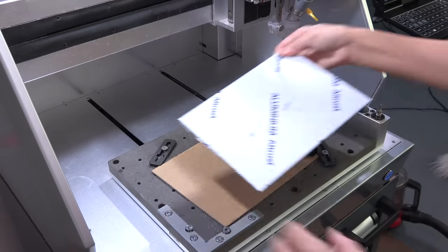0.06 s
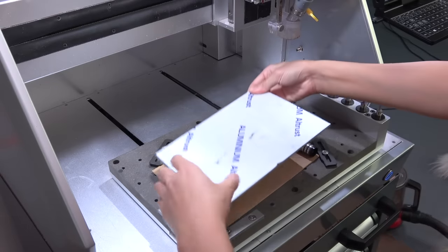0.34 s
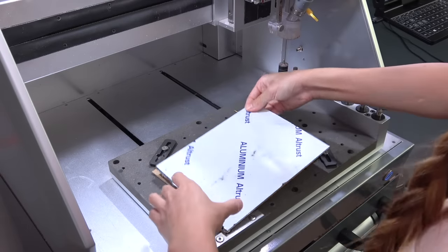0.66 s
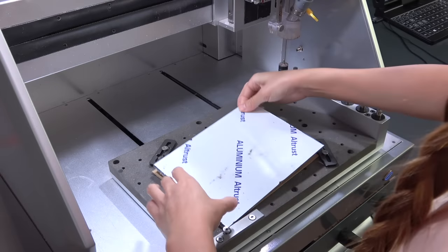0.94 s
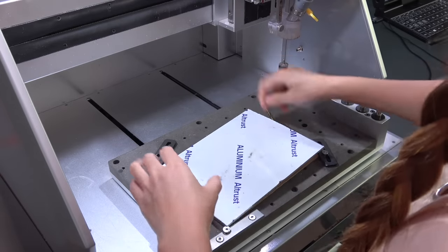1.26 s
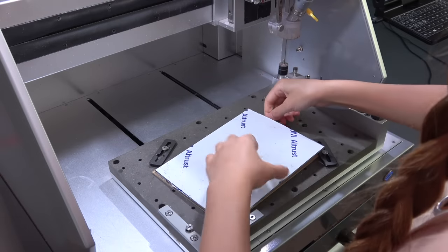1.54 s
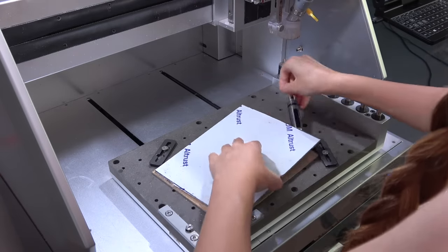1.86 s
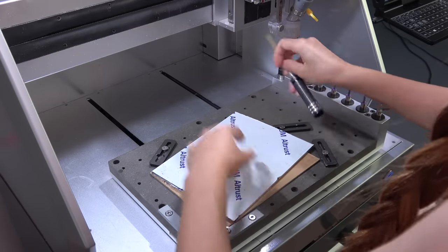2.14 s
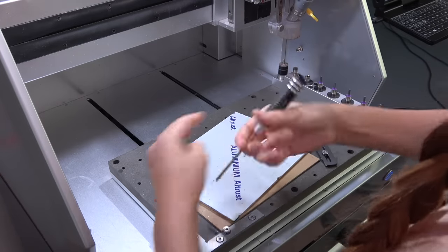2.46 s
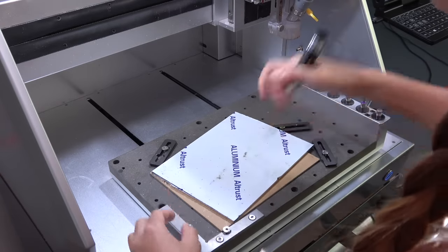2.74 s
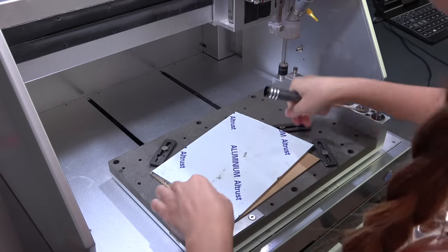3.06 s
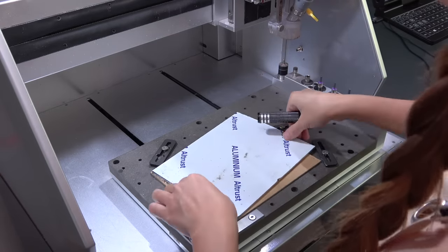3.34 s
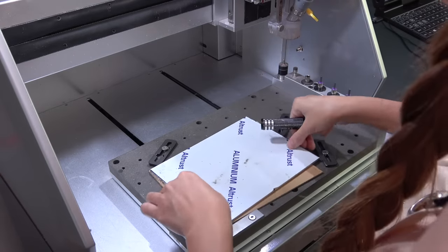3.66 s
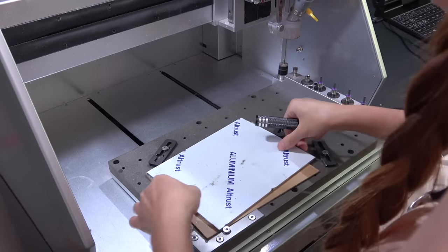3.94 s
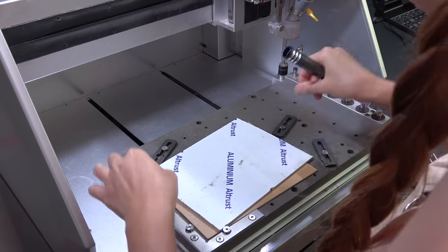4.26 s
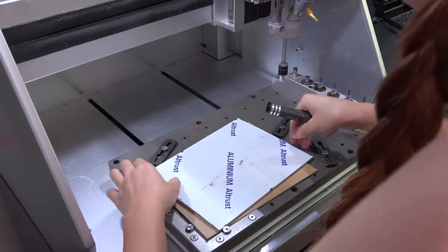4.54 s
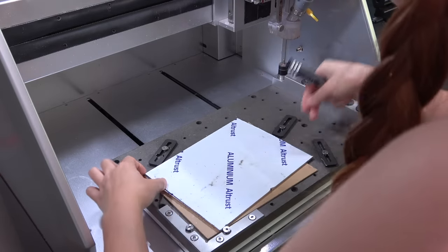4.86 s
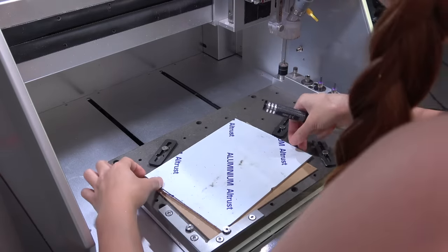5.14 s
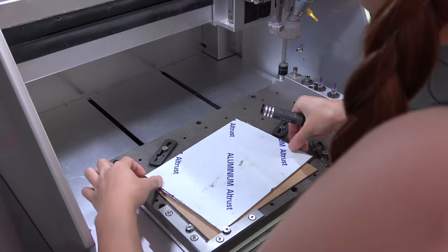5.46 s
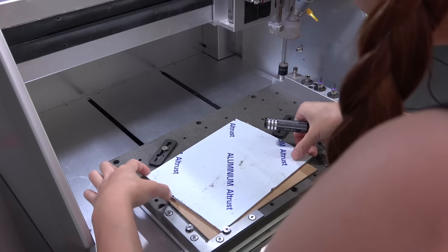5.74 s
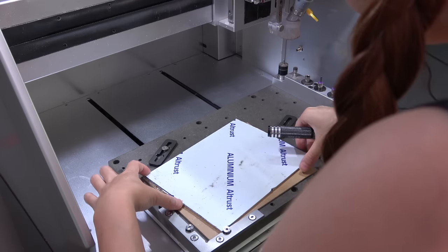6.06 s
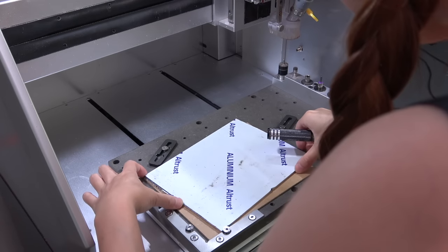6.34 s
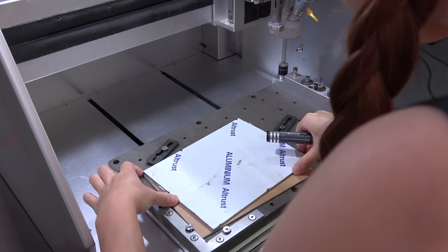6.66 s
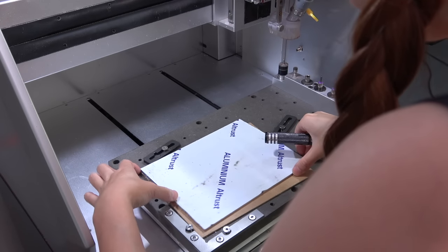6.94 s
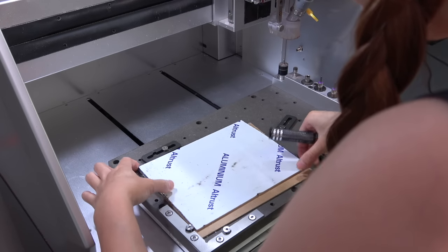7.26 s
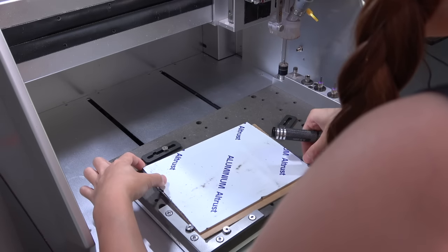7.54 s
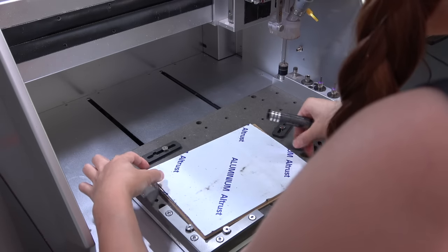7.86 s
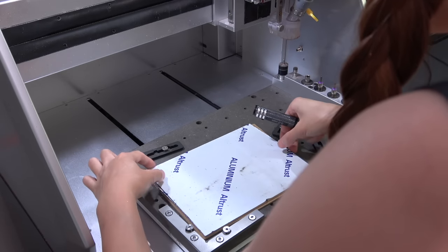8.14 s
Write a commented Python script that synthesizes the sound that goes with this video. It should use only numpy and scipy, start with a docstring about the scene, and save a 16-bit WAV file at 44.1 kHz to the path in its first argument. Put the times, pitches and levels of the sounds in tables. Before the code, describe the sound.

A faint fan hums while a thin metal sheet clatters and thumps down onto cardboard. More clacks and a short scrape lead into the loud bang of a steel tool on a metal bed, which rings as the machine cabinet booms. The rest is softer: hands rubbing and nudging the sheet, small high clinks, occasional dull knocks. It is heard from nearby in a small, slightly echoing workshop.

```python
"""Over a humming fan come a low bump and a soft rub, then the clacks, scrapes and thuds of an aluminium sheet
being laid on a cardboard pad on the bed of a small milling machine. A steel clamp slams onto the bed, which
rings while the cabinet booms. Hands slide, press and tap the sheet; two loose steel clamps clink. Blows are
decaying modes, scrapes are stick-slip pulses driving those modes, rubs are fine friction noise, and the fan is
air noise with housing resonances. Blows and scrapes echo in a small workshop."""
import sys
import numpy as np
from scipy import signal
from scipy.fft import rfft, irfft
from scipy.io import wavfile
from scipy.ndimage import uniform_filter1d

SR = 44100
rng = np.random.default_rng(int(sys.argv[2]) if len(sys.argv) > 2 else 0)


def waveform_to_disk(signal):
    """Save audio, clipped to [-1, 1], as 16-bit WAV at the path in sys.argv[1]."""
    frames = np.transpose(np.atleast_2d(signal))
    scaled = np.clip(frames, -1, 1) * 32767
    samples = np.round(scaled).astype(np.int16)
    wavfile.write(sys.argv[1], SR, samples)


N = 370440
TIME = np.arange(N) / SR
AGE = np.arange(SR) / SR  # seconds since a blow
SHORT = SR // 5  # samples in a damped blow
SOFT_CONTACT_HZ = 1220

# Modes of sheet, machine cabinet and frame. Each row: frequency in Hz, level in dB, base t60 in seconds.
SHEET_MODES = [(745, -15, .12), (921, -9.5, 0.17), (1111.5, -10.5, .12), (1470, -7.5, .13), (1844, 0, .12),
               (1882, -4, .08), (2085, -5.5, 0.1), (2245, -3.5, 0.1), (2396, -6.5, 0.14), (2700, -7, 0.065),
               (3370, -8, .11), (3460, -8, .11), (3684, -8.5, .09), (4490, -16, 0.1), (4740, -19.5, 0.21),
               (5210, -22.5, 0.11), (6055, -15.5, .12), (6700, -26, 0.089), (8100, -27, .1),
               (9200, -25.5, .08), (10600, -30.5, .08)]
CABINET_MODES = [(128, -9.5, 0.41), (140.4, -2.5, .5), (150.7, -0.5, 0.34), (166, -8, .3), (242, -11.5, .3),
                 (333, -7, 0.23)]
FRAME_MODES = [(67, 0.5, 1.8), (93, 0.5, 1.2)]
# Dense modes of sheet, pad and bare contact. Each row: frequency in Hz, density in dB, base t60 in seconds.
SHEET_BANDS = [(300, -12, .1), (900, -1.5, .1), (2000, -1, 0.11), (3600, -3.5, 0.14), (5000, -14, .08),
               (9500, -20, .07), (15000, -26, .06)]
PAD_BANDS = [(120, -11.5, .25), (300, -5, 0.19), (597, -0.5, .12), (1100, -1, .07), (1598, -11, 0.062),
             (4000, -19.5, 0.068)]
TICK_BANDS = [(1000, -9, .02), (3010, -2.5, 0.023), (6060, -3.5, 0.017), (8800, 1, 0.044),
              (11400, -8.5, 0.021), (15000, -7.5, 0.023)]


def amp(db):
    """Decibels to gain."""
    return np.exp(np.asarray(db) * (np.log(10) / 20))


def unit(x):
    """Scale to rms 1."""
    return x / np.sqrt(np.mean(x ** 2))


def unit_hit(x):
    """Scale a blow's loudest 256 samples to rms 1."""
    return x / np.sqrt(uniform_filter1d(x ** 2, 256).max())


def add(track, start_s, x):
    """Mix x into the track."""
    start = int(start_s * SR)
    track[start:start + len(x)] += x[:N - start]


def over_hz(points_hz, values, size):
    """Interpolate onto FFT bins in log frequency."""
    return np.interp(np.log(np.arange(size // 2 + 1) * SR / size + 1), np.log(points_hz), values)


def colour(x, spectrum):
    """Filter by a spectrum, to rms 1."""
    hz, db = np.transpose(spectrum)
    return unit(irfft(rfft(x) * amp(over_hz(hz, db, len(x))), len(x)))


def soften(x, hz):
    """Low-pass: a softer contact lasts longer and loses treble."""
    return signal.sosfilt(signal.butter(2, min(hz, .45 * SR), fs=SR, output="sos"), x)


def resonate(x, hz, width_hz):
    """One resonance, gain 1 at its centre."""
    return signal.lfilter(*signal.iirpeak(min(hz, .45 * SR), hz / width_hz, fs=SR), x)


def drift(rate_hz):
    """Slow random curve, rms 1."""
    count = int(N / SR * rate_hz) + 2
    return unit(np.interp(TIME, np.linspace(0, N / SR, count), rng.standard_normal(count)))


def envelope(hz, t60_s, build_cycles, size):
    """Rise and decay of a ring; low bending waves spread slowly and build late."""
    age = AGE[:size]
    return (1 - np.exp(-age * hz / build_cycles)) * np.exp(-np.log(1000) * age / t60_s)


def ring(modes, t60_scale=1, build_cycles=1, scatter_db=1.5, detune=.004, size=SHORT):
    """Decaying modes; level, tuning and phase vary per blow."""
    out = np.zeros(size)
    for hz, db, t60_s in modes:
        loud, sharp, phase = rng.standard_normal(3)
        tone = np.sin(2 * np.pi * (hz * (1 + detune * sharp) * AGE[:size] + phase))
        out += amp(db + scatter_db * loud) * tone * envelope(hz, t60_s * t60_scale, build_cycles, size)
    return unit_hit(out)


def dense(bands, t60_scale=1, build_cycles=1, size=SHORT):
    """Modes too close to resolve: noise with a decay per band."""
    hz, db, t60_s = np.transpose(bands)
    spectrum = rfft(rng.standard_normal(size)) * amp(over_hz(hz, db, size))
    bins_hz = np.arange(len(spectrum)) * SR / size
    spectrum *= 1 - np.exp(-(bins_hz / hz[0]) ** 2)  # roll off under the lowest band
    out = np.zeros(size)
    for share, band_hz, decay_s in zip(np.eye(len(hz)), hz, t60_s * t60_scale):
        band = irfft(spectrum * over_hz(hz, share, size), size)
        out += band * envelope(band_hz, decay_s, build_cycles, size)
    return unit_hit(out)


def slips(per_s, spread_db):
    """Friction: tiny random slips, a few much larger than the rest."""
    sizes = amp(spread_db * np.minimum(rng.exponential(size=N), 4))
    return unit((rng.random(N) < per_s / SR) * sizes * rng.standard_normal(N))


def fan(air_db=-45.5, waver_db=0.8):
    """Air through a cooling fan hums in the housing's resonances."""
    # Air noise. Each row: frequency in Hz, density in dB.
    air_spectrum = [(25, -14), (50, -11), (120, -12), (210, -12.5), (330, -2.5), (450, 1), (740, -2),
                    (880, -10.5), (1050, -17), (1700, -22.5), (3400, -29.5), (4300, -35.5), (7000, -39.5),
                    (16000, -39.5)]
    # Housing resonances. Each row: frequency in Hz, width in Hz, level in dB.
    housing = [(150, 15, -68.5), (275, 14, -64.5), (440.2, 55, -51), (585.8, 25, -59), (725, 110, -53.5)]
    air = amp(air_db) * colour(rng.standard_normal(N), air_spectrum)
    hum = np.zeros(N)
    for hz, width_hz, db in housing:
        band = resonate(rng.standard_normal(N), hz, width_hz)
        hum += amp(db) * unit(resonate(band, hz, width_hz))
    return air + hum * amp(waver_db * drift(5))


def bumps():
    """The heavy frame sounds low, fading notes: one as the scene opens, others as hands lean on the machine."""
    # Each row: start in seconds, level in dB, frequency in Hz, t60 in seconds.
    low_notes = [(0.0, -41.5, 41.6, 0.35), (0.0, -50.5, 78, 0.53), (2.82, -53, 86, 0.27),
                 (4.29, -56, 85.4, .3)]
    out = np.zeros(N)
    for start_s, db, hz, t60_s in low_notes:
        add(out, start_s, amp(db) * ring([(hz, 0, t60_s)], size=SR))
    return out


def fingers_moving():
    """1 while the fingers move, 0 at rest."""
    # Each row: start and end in seconds.
    spans = [(0, 5.85), (6.9, 7.6)]
    moving = sum(1. * ((TIME >= start_s) & (TIME < end_s)) for start_s, end_s in spans)
    return uniform_filter1d(moving, size=4096)


def slides(flutter_db=1.6, hiss_db=-19.5, fidget_db=-58.5, fidget_spread_db=3):
    """Skin and sheet rub over cardboard in swells of fine friction, with faint fidgeting between."""
    # Each row: centre in seconds, half length in seconds, level in dB.
    strokes = [(0.01, .18, -44), (0.698, 0.22, -47), (1.14, 0.023, -41.5), (1.36, 0.23, -52),
               (2.61, 0.19, -55), (2.876, 0.054, -47), (3.462, 0.04, -45), (3.773, 0.16, -51.5),
               (3.989, 0.042, -43.5), (4.334, 0.065, -49), (5.42, 0.069, -47), (6.709, 0.031, -46.5),
               (7.021, 0.042, -44.5), (7.52, 0.024, -42.5), (7.74, 0.097, -54.5), (8.25, 0.12, -51)]
    # Friction spectra. Each row: frequency in Hz, density in dB.
    rub_spectrum = [(40, -8.5), (150, 8), (220, 1), (400, 8), (800, 4.5), (1100, 4.5), (1500, 2.5),
                    (1900, 1), (2600, -1.5), (3600, -1.5), (4300, -10), (6300, -19), (9000, -28.5),
                    (16000, -40.5)]
    hiss_spectrum = [(3000, -15.5), (5000, 0), (7000, -0.5), (10000, 1), (13000, 0), (16000, 0.5)]
    coarse_s = TIME[::100]
    power = sum(np.exp(-((coarse_s - mid_s) / half_s) ** 2) * amp(db) ** 2
                for mid_s, half_s, db in strokes)
    fidget = fingers_moving() * amp(fidget_db + fidget_spread_db * drift(5))
    gain = np.sqrt(np.interp(TIME, coarse_s, power) + fidget ** 2)
    friction = slips(per_s=11000, spread_db=2.8) * amp(flutter_db * drift(60))
    return gain * (colour(friction, rub_spectrum) + amp(hiss_db) * colour(friction, hiss_spectrum))


def clack(db, focus_hz, boost_db, contact_hz, firm_db=-14.5):
    """The sheet's edge hits the bed; the striking point favours some modes, the hand damps all."""
    # Harder blows shake freer of the hand and chatter longer.
    t60_scale = .7 * 2 ** ((db - firm_db) / 35)
    attack_s = .0035 * 2 ** ((db - firm_db) / 11.5)
    sheet = ring(SHEET_MODES, t60_scale) + amp(-3) * dense(SHEET_BANDS, t60_scale)
    hit = sheet + amp(-15) * dense(TICK_BANDS)
    hit += (amp(boost_db) - 1) * resonate(hit, focus_hz, width_hz=.088 * focus_hz)
    attack = 1 - np.exp(-AGE[:SHORT] / attack_s)
    return amp(db) * unit_hit(soften(hit, contact_hz) * attack)


def clacks():
    """Edge strikes as the sheet is laid down and shifted."""
    # Each row: start in seconds, level in dB, favoured pitch in Hz, its boost in dB, cut-off in Hz.
    strikes = [(0.075, -40, 2200, 4, 7000), (0.541, -15.5, 1830, 13, 10500), (0.776, -36.5, 2900, 12, 8000),
               (0.8303, -15.5, 3450, 9, 5800), (0.897, -26.5, 3700, 3.5, 15000),
               (1.0126, -29.5, 2080, 5, 3500), (1.0948, -28, 2000, 3.5, 6070),
               (1.163, -37.5, 2996, 6, 15000), (1.198, -42, 4010, 8, 14000), (1.622, -42.5, 3400, 9, 7960),
               (1.667, -37.5, 1900, 10.5, 7000), (1.681, -36.5, 1900, 10, 9100),
               (1.716, -32.5, 13000, 24.5, 15000), (1.8475, -11, 2050, 7, 7100),
               (1.873, -16, 2250, 4, 8030), (1.987, -28, 2200, 1.5, 12000), (3.155, -47, 2680, 7, 7000),
               (3.989, -31.5, 3080, 15.5, 7000), (4.492, -49, 2520, 5, 9000), (5.24, -42, 2100, 4, 4000),
               (6.679, -43.5, 3400, 5, 12040)]
    out = np.zeros(N)
    for start_s, db, focus_hz, boost_db, contact_hz in strikes:
        add(out, start_s, clack(db, focus_hz, boost_db, contact_hz))
    return out


def taps(per_s=1.8, db=-55, spread_db=3.5, spread_octaves=0.37):
    """Under moving fingers the sheet taps lightly at random times and spots."""
    out, moving = np.zeros(N), fingers_moving()
    for when, loud, spot in rng.uniform(-1, 1, (int(per_s * N / SR), 3)):
        start_s = (1 + when) / 2 * TIME[-1]
        if moving[int(start_s * SR)] > .5:
            focus_hz = 3000 * 2 ** (spread_octaves * spot)
            add(out, start_s, clack(db + spread_db * loud, focus_hz, boost_db=5, contact_hz=8000))
    return out


def drag_gain(start_s, length_s, swell_db=23.5, fade_db=16.5):
    """The edge bites, holds and lets go; slopes are per drag length."""
    progress = (TIME - start_s) / length_s
    db = swell_db * np.minimum(progress, 0) - fade_db * np.maximum(progress - 1, 0)
    return amp(np.maximum(db, -200))


def scrape(lock_db=3, grit_db=-10, pad_db=-10, cabinet_db=-18.5):
    """The dragged edge sticks and slips, driving sheet, pad and cabinet."""
    # Each row: start in seconds, length in seconds, squeal in dB, judder in dB.
    drags = [(0.492, 0.019, -43, -34.5), (1.773, .09, -27.5, -27), (1.991, .035, -27.5, -37.5),
             (6.985, .08, -66, -47), (7.503, 0.04, -57, -43.5)]
    # Low judder. Each row: frequency in Hz, level in dB, t60 in seconds.
    judder_modes = [(757, 1, 0.1), (807, -5.5, .05), (918, 0, .06), (1025, -6.5, .04), (1103, 0, 0.095)]
    squeal_gain, judder_gain = sum(amp([[squeal_db], [judder_db]]) * drag_gain(start_s, length_s)
                                   for start_s, length_s, squeal_db, judder_db in drags)
    force = slips(per_s=2100, spread_db=2.5)
    bodies = (ring(SHEET_MODES), dense(SHEET_BANDS), ring(judder_modes),
              soften(dense(PAD_BANDS), SOFT_CONTACT_HZ), ring(CABINET_MODES, size=SR))
    sheet, grit, low, pad, cabinet = (unit(signal.oaconvolve(force, body)[:N]) for body in bodies)
    locked = amp(lock_db) * resonate(sheet, 1850, 150)  # the strongest mode locks the slips
    squeal = unit(sheet + locked) + amp(grit_db) * grit
    judder = low + amp(pad_db) * pad + amp(cabinet_db) * cabinet
    return squeal_gain * squeal + judder_gain * judder


def thuds(frame_db=-17.5, boom_db_per_octave=-15.5):
    """The sheet lands flat on the pad, and the slammed clamp bounces once; softer landings boom more in cabinet
    and frame."""
    # Each row: start in seconds, level in dB, contact cut-off in Hz. The row at 2.061 s is the slammed clamp
    # bouncing.
    landings = [(0.543, -19, 1250), (0.832, -32.5, 1900), (0.9035, -21, 1180), (1.018, -41.5, 800),
                (1.207, -36.5, 870), (1.85, -26.5, 1400), (1.878, -26, 1040), (2.061, -23.5, 3000),
                (3.992, -36.5, 1700), (5.2395, -26.5, 1870), (7.535, -28, 1750), (7.978, -39.5, 2800)]
    # Sheet on pad. Each row: frequency in Hz, level in dB, base t60 in seconds.
    pad_modes = [(389, -5.5, 0.2), (494, -7.5, 0.12), (683, -2.5, .08), (937, 0.5, 0.077),
                 (1025, -3.5, .05)]
    out = np.zeros(N)
    for start_s, db, contact_hz in landings:
        pad = ring(pad_modes, t60_scale=.99, build_cycles=2.5)
        pad += dense(PAD_BANDS, t60_scale=.99, build_cycles=2.5)
        add(out, start_s, amp(db) * unit_hit(soften(pad, contact_hz)))
        cabinet = ring(CABINET_MODES, t60_scale=1.1, build_cycles=3, size=SR)
        frame = amp(frame_db) * ring(FRAME_MODES, t60_scale=.77, size=SR)
        boom_db = db - 10.5 + boom_db_per_octave * np.log2(contact_hz / SOFT_CONTACT_HZ)
        add(out, start_s, amp(boom_db) * (cabinet + frame))
    return out


def clinks():
    """A touched steel clamp scratches briefly and rings high."""
    # Each row: start in seconds, ring in dB, clamp index, t60 scale, cut-off in Hz, scratch in dB.
    touches = [(1.545, -54.5, 0, 0.83, 8150, -60), (1.683, -45, 0, .7, 12000, -55),
               (3.448, -42.5, 0, 0.69, 5000, -47), (3.731, -35.5, 0, 0.34, 4460, -41),
               (3.994, -35, 0, 0.79, 9000, -50), (6.681, -43.5, 1, 0.74, 10000, -50),
               (7.972, -58, 1, .7, 11000, -63)]
    # One list per clamp. Each row: frequency in Hz, level in dB, base t60 in seconds.
    clamp_modes = [
        [(5740, -24, .45), (7910, -0.5, 0.18), (8010, -8, .12), (9415, -16.5, .25), (11150, -22, .15),
         (13390, -16.5, .3)],
        [(5860, -22.5, 0.36), (7397, -8.5, .3), (7470, -1, .19), (13190, -8, .22), (15370, -11, .2)],
    ]
    out = np.zeros(N)
    for start_s, ring_db, clamp, t60_scale, contact_hz, scratch_db in touches:
        steel = ring(clamp_modes[clamp], t60_scale, build_cycles=12, scatter_db=2.5, detune=.001,
                     size=SR // 2)
        scratch = dense(TICK_BANDS, t60_scale=1.1, build_cycles=10)
        add(out, start_s, amp(ring_db) * unit_hit(soften(steel, contact_hz)))
        add(out, start_s, amp(scratch_db) * unit_hit(soften(scratch, 2 * contact_hz)))
    return out


def bang(frame_db=-39.5):
    """A steel clamp slams onto the bed: a hard crack, the bed rings, cabinet and frame boom."""
    # Start in seconds, then crack, bed modes, dense bed ring and cabinet boom in dB.
    clamp_slam = (2.0408, -5.5, -21, -16.3, -30)
    # Steel contact and bed. Each row: frequency in Hz, level (bands: density) in dB, t60 in seconds.
    crack_bands = [(300, -11, 0.034), (600, 1.5, 0.051), (1500, -4.5, .03), (2700, -1, 0.035),
                   (3800, 6, 0.041), (5200, -15, .018), (9300, -11, 0.02), (12000, -17, .015),
                   (15500, -16.5, .02)]
    bed_modes = [(339.3, -5, .32), (656, -3, 0.49), (685, -7, .4), (1140, -15, 0.5), (1260, -11, .29),
                 (1510, -12, .4), (1836, -14.5, .31), (2040, -7, .2), (2310, -15.5, 0.67),
                 (2708, -15.5, .45), (3180, -17, .6), (3300, -14, .49), (3513, -9, .4), (3693, -14.5, .72),
                 (3700, -11, .72), (3720, -6.5, 0.38), (3900, -14.5, .64), (3871, -14, .68),
                 (4177, -19, .5), (4721, -16, .17), (6700, -22.5, .44), (9100, -25.5, .43)]
    bed_bands = [(60.2, -14.5, .9), (199.5, -7, .5), (400, 1, .25), (655, 6, .2), (900, -7, .3),
                 (1400, 2, 0.34), (2600, -5, .25), (3400, -3.5, .23), (4110, 0, 0.24), (4750, -18.5, .28),
                 (5770, -21.5, .28), (6800, -9.5, .4), (7960, -27.5, .28), (9200, -17.5, .35),
                 (11040, -30, .26), (15200, -16, .24)]
    start_s, crack_db, ring_db, dense_db, boom_db = clamp_slam
    out = np.zeros(N)
    add(out, start_s, amp(crack_db) * dense(crack_bands, build_cycles=2.5))
    add(out, start_s, amp(ring_db) * ring(bed_modes, detune=.0005, size=SR))
    add(out, start_s, amp(dense_db) * dense(bed_bands, build_cycles=1.5, size=SR))
    add(out, start_s, amp(boom_db) * ring(CABINET_MODES, t60_scale=1.8, build_cycles=3, size=SR))
    add(out, start_s, amp(frame_db) * ring(FRAME_MODES, size=SR))
    return out


def workshop_echo(x, build_s=0.012):
    """Wall reflections build into a diffuse tail."""
    # Each row: frequency in Hz, density in dB, t60 in seconds.
    room_bands = [(60, -3, 1), (250, 1, 0.86), (1000, 0, .62), (4010, 0, 0.79), (7000, -2, .62),
                  (15000, -3.5, .42)]
    walls = dense(room_bands, size=SR) * (1 - np.exp(-AGE / build_s))
    return signal.oaconvolve(x, walls / np.sqrt(np.sum(walls ** 2)))[:N]


def scene(handling_echo_db=-16.5, bang_echo_db=-11.5):
    """Mono mix; the bang fills the room most, while bumps, slides and fan stay dry."""
    handling = clacks() + taps() + thuds() + clinks() + scrape()
    slam = bang()
    echo = workshop_echo(amp(handling_echo_db) * handling + amp(bang_echo_db) * slam)
    return (handling + slam + echo + bumps() + slides() + fan())[None]


def record(dry):
    """Clip at full scale, then low-pass at 15.9 kHz."""
    return signal.sosfilt(signal.ellip(10, .2, 70, 15900, fs=SR, output="sos"), np.clip(dry, -1, 1))


dry = scene()
out = record(dry)
waveform_to_disk(out)
```